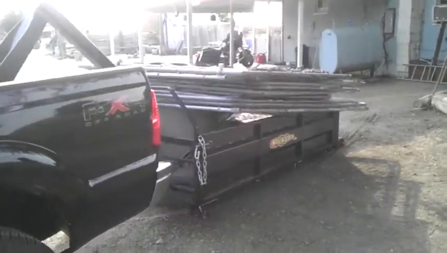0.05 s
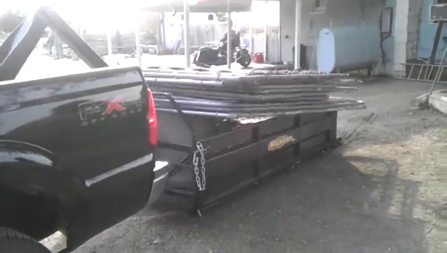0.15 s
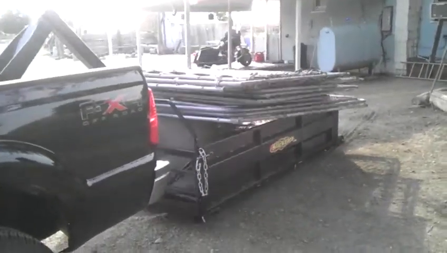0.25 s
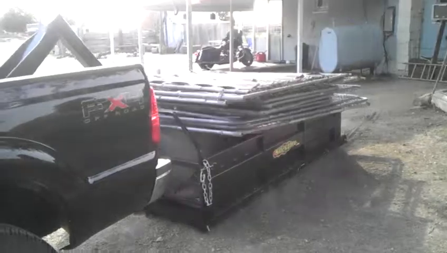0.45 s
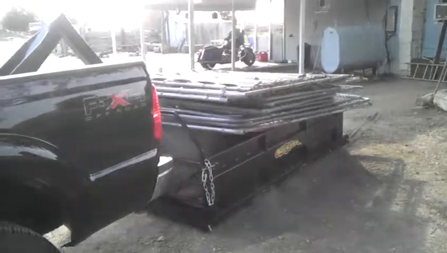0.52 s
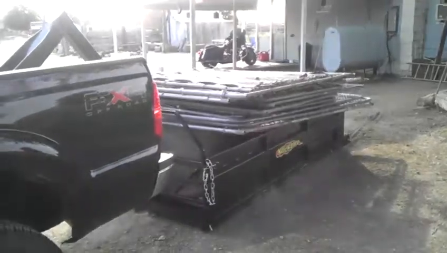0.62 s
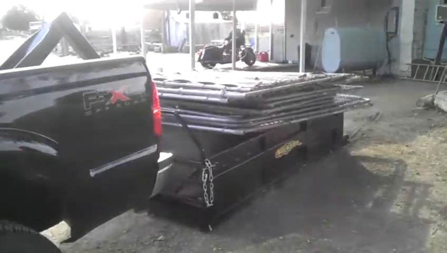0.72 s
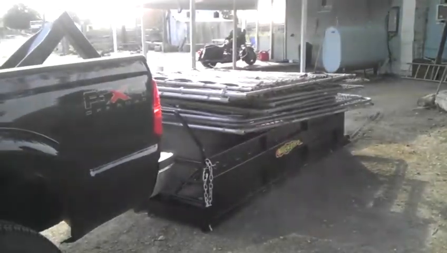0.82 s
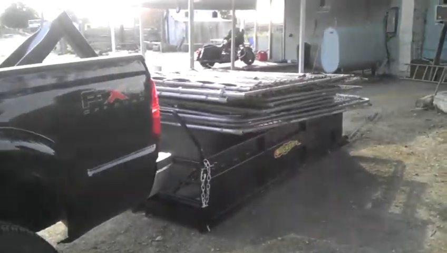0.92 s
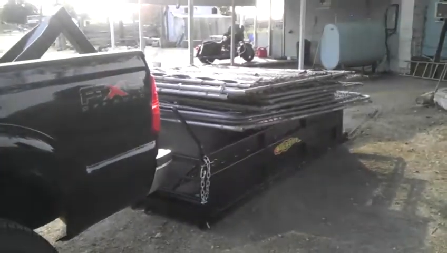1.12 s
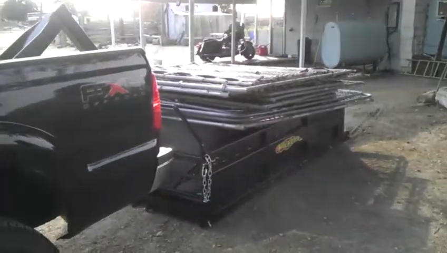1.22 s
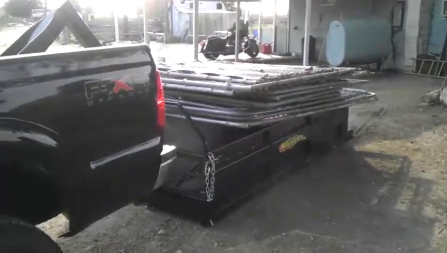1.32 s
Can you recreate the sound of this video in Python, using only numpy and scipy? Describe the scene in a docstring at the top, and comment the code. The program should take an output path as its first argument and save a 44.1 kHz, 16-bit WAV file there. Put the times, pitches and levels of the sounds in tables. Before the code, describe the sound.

A loaded steel skip lands on dirt while a hydraulic pump whines over a low truck idle. A light knock at 0.2 seconds leads to a loud, slightly distorted boom and clank around 0.4 to 0.5 seconds. Pipe gates rattle, groan and creak until about 0.8 seconds, then settle with smaller knocks. Near 0.9 seconds the pump switches off and its whine falls in pitch.

```python
"""A hydraulic pump whines over an idling truck as it lowers a steel skip of pipe gates in a yard.
One corner touches, then the whole frame slams onto the dirt with a boom and a clank that clips the
input; the gates rattle, groan and settle. Relieved of the weight, the pump changes its whine, is
switched off and coasts down, its falling tones flaring in the resonances of its housing."""
import sys
import numpy as np
from scipy import signal
from scipy.fft import rfft, irfft, next_fast_len
from scipy.io import wavfile
from scipy.ndimage import map_coordinates

SR = 44100
rng = np.random.default_rng(int(sys.argv[2]) if len(sys.argv) > 2 else 0)


def materialize(psi):
    """Save the field psi as 16-bit PCM at rate SR to the path in sys.argv[1].

    A 1-D psi becomes a single channel; in a 2-D psi each row is a channel.
    """
    bounded = np.clip(np.atleast_2d(psi).T, -1, 1)
    quanta = np.round(bounded * 32767).astype(np.int16)
    wavfile.write(sys.argv[1], SR, quanta)


N = 59535

# Pump whine under load, running free and coasting, all at full shaft speed: pitch_hz, level_db
LOADED_TONES = [(995.9, -41), (1077, -32.5), (1244, -43), (2154, -34), (2406, -45), (3235, -46),
                (3898, -59), (4312, -51), (4807, -43), (5556, -50.5), (6465, -47), (6632, -48), (6799, -50),
                (6880, -46), (6966, -62), (7214, -60), (7461, -54), (7628, -61), (8123, -52), (8210, -48.5),
                (8624, -54), (8705, -58), (8872, -50), (9701, -52.5), (10777, -71)]
FREE_TONES = [(1077, -36), (2157, -37.5), (5389, -42.5), (6465, -50), (7542, -57), (8624, -56)]
COAST_TONES = [(1078, -43), (2156, -43.5), (2404, -42.5), (3067, -47), (4808, -52), (5389, -52),
               (6465, -50), (11300, -54)]
# Fader on the pump's buzz and oil hiss: time_s, level_db
PUMP_FADER = [(0, -36), (.45, -34), (.55, -70), (.62, -39), (.72, -37), (1.0, -36), (1.2, -42.5),
              (1.35, -44.5)]
# Colour of that buzz and hiss: frequency_hz, gain_db
PUMP_EQ = [(300, -45), (520, -7), (750, 2), (1100, 5.5), (1550, -11.5), (2200, 4), (2900, -9), (4000, -10),
           (4800, -6.5), (5900, -13), (6700, -7), (8300, -5.5), (9500, -14.5), (11500, -19), (13500, -24)]
# Resonances of the pump housing: centre_hz, half_width_hz, boost_db
HOUSING_PEAKS = [(1142, 26, 18), (1835, 50, 9), (2070, 60, 4)]
SHAFT_HZ, SLOWING_PER_S = 82.89, 2.2
RELIEF_S, FREE_S, OFF_S, CROSSFADE_S = 0.56, 0.68, .935, 0.02  # load off, running free, power off

# Engine notes of the truck: pitch_hz, level_db
IDLE_TONES = [(143, -43), (167, -43), (214, -36.5), (236.9, -36), (581, -43), (910, -44.5)]
# Colour of its rumble: frequency_hz, gain_db
RUMBLE_EQ = [(25, -47), (50, -50), (75, -9.5), (110, -7), (160, 0), (220, -1), (320, -3.5), (480, -12.5),
             (750, -11), (1500, -21), (4000, -67)]
# Fader on the truck: time_s, level_db
TRUCK_FADER = [(0, -30), (.1, -34.5), (.25, -29.5), (.6, -29), (.9, -41.5), (1.35, -37)]

# Blows on the skip's frame: start_s, level_db, tilt_db_per_octave, rise_s, ring_db
BLOWS = [(0.201, -26.5, 0.5, 0.0037, -16), (0.405, -18.5, 1, 0.012, -1), (0.457, -15.5, 3.5, 0.0073, -3.5),
         (.468, -15.5, 0.5, 0.00044, -2.5), (0.485, -15.5, 2, 0.0011, -9.5),
         (0.496, -14.5, -3.5, 0.0049, -9), (0.555, -23.5, -1.5, 0.0074, -3.5),
         (0.587, -34, -15, 0.0045, -27), (0.667, -30, 10.5, 0.0055, -10), (0.759, -28, 0.5, 0.0034, -4),
         (.786, -24.5, 1, 0.0029, -6), (0.848, -30, -10, 0.0036, -4), (0.945, -31, -1, 0.0014, 1),
         (0.972, -24.5, -10, 0.0056, -7.5)]
# Colour of a blow: frequency_hz, gain_db
FRAME_EQ = [(30, -45.5), (55, -36), (80, -17), (140, 0.5), (280, 1.5), (440, -4), (600, -2), (900, -6),
            (1400, -8), (2300, -9), (3500, -25), (7000, -27), (13000, -34.5)]
# Main notes of the frame: pitch_hz, level_db, t60_s
FRAME_MODES = [(141.1, -12, 0.24), (210.1, -2, 0.24), (300.6, 3, 0.16), (529.3, -3.5, 0.17), (616, -3, 0.2),
               (711, -4, 0.27), (789, -6, 0.49), (923, -13.5, 0.59), (1010, -22, 1)]
# Ring-out of the panels: frequency_hz, t60_s
PANEL_DECAY = [(80, 0.35), (300, 1), (1000, 0.56), (2500, 0.68), (9000, 0.13)]
# Panel booms from heavy contacts with the soil: start_s, pitch_hz, level_db, t60_s
BOOMS = [(0.409, 809.4, -13.5, 0.073), (0.408, 1074, -20, 0.11), (0.409, 270.8, -6.5, 0.031),
         (0.474, 85.3, -15.5, 0.1), (0.468, 598.5, -6.5, 0.08), (0.467, 690, -9.5, 0.087),
         (0.48, 535.8, -12, 0.099), (0.493, 313, -2, 0.046), (0.557, 617.4, -20.5, 0.087),
         (0.594, 237.7, -22, 0.036), (0.8, 274.2, -17.5, 0.088)]

# Pipe gates shifting on each other: peak_s, level_db, rise_s, t60_s
RATTLES = [(0.425, -40, 0.0076, 0.2), (0.475, -17.5, 0.009, 0.15), (0.545, -25, 0.026, 0.42),
           (0.697, -29.5, 0.023, 0.23), (.955, -36, 0.012, 0.13), (1.112, -35, 0.0039, 0.26),
           (1.18, -35, 0.0054, 0.54)]
# Colour of a rattle: frequency_hz, gain_db
RATTLE_EQ = [(600, -40), (1500, -3.5), (2600, 5.5), (4000, -1.5), (6000, -3), (9000, -12.5), (13500, -27)]
# Steel-on-steel hits: start_s, level_db
CLANKS = [(0.472, 3.5), (0.4726, -2)]
# High partials of the steel, the wider the shorter: pitch_hz, nominal_width_hz, level_db
STEEL_MODES = [(1590, 200, -10), (2153, 64, -7), (2536, 102, -3.5), (3004, 230, 5), (3784, 220, -10.5),
               (4163, 174, -7), (5250, 294, -6.5), (7600, 64, -14.5)]
# Colour of the clank's crack: frequency_hz, gain_db
CRACK_EQ = [(800, -8), (2500, 5), (4500, 1), (7000, -5.5), (10000, -10), (13500, -52)]
# Rubbing steel, one path for a long groan and one for a quick creak: time_s, pitch_hz, level_db
GROAN_PATHS = [
    [(.54, 800, -46), (.575, 780, -23.5), (.64, 711, -32.5), (.68, 671, -31), (.71, 640, -63)],
    [(.781, 1246, -46), (.792, 831, -37), (.806, 600, -53)],
]
# Hum of the settling gates: pitch_hz, level_db, t60_s
SETTLE_MODES = [(264, -26, 0.22), (331, -26.5, 0.35), (406.4, -20, 0.35), (498, -30.5, 0.29)]

# Balance of the pump, and of all the rest: frequency_hz, left_minus_right_db
PUMP_PAN = [(300, -6), (1000, -3.5), (2200, -9), (4800, -4.5), (8000, -5.5), (12000, -11.5)]
SKIP_AND_TRUCK_PAN = [(60, -3), (300, -2), (700, -1.5), (1500, -4), (2500, -9.5), (4000, -3), (6000, -1.5),
                      (10000, -13.5)]
# Likeness of left and right, 1 being mono: frequency_hz, correlation
STEREO_LIKENESS = [(60, 1), (400, 0.91), (800, 0.97), (1500, 0.38), (3000, 0.24), (6000, 0.16),
                   (12000, 0.15)]
# Echo of the yard: frequency_hz, t60_s
YARD_DECAY = [(200, 0.11), (2000, 0.076), (10000, 0.19)]


def amp(db):
    """Decibels to gain."""
    return 10 ** (np.asarray(db) / 20)


def unit(x):
    """Scale to rms 1."""
    return x / np.sqrt(np.mean(x ** 2) + 1e-20)


def along(points, hz):
    """Read a curve at hz on a log frequency axis."""
    frequencies, values = np.transpose(points)
    return np.interp(np.log(hz + 1), np.log(frequencies + 1), values)


def clock():
    """Time of every sample."""
    return np.arange(N) / SR


def since(start_s):
    """Time since start_s, zero before."""
    return np.maximum(clock() - start_s, 0)


def curves(rows):
    """One automation lane for each column after the time."""
    times, *columns = np.transpose(rows)
    return [np.interp(clock(), times, column) for column in columns]


def wobble(rate):
    """A smooth random curve, rate knots a second."""
    return map_coordinates(rng.standard_normal(200), [clock() * rate], mode="wrap")


def decay(t, t60):
    """Gain after t seconds of ringing."""
    return amp(-60 * t / t60)


def attack(start_s, rise_s):
    """Exponential fade-in."""
    return 1 - np.exp(-since(start_s) / rise_s)


def struck(start_s, rise_s, t60):
    """Envelope of a blow."""
    return attack(start_s, rise_s) * decay(since(start_s), t60)


def filtered(x, response):
    """EQ x with a gain that is a function of frequency."""
    size = next_fast_len(N + SR // 4)
    return irfft(rfft(x, size) * response(np.fft.rfftfreq(size, 1 / SR)), size)[..., :N]


def panned(x, pan):
    """Pan each frequency to its own place."""
    return filtered(x, lambda hz: amp(np.outer([.5, -.5], along(pan, hz))))


def stereo_angle(hz):
    """Stereo width in radians, 0 being mono."""
    return np.arccos(np.clip(along(STEREO_LIKENESS, hz), -1, 1)) / 2


def spread(pair, eq, tilt_db=0):
    """Two unrelated signals become one coloured stereo sound of rms 1."""
    def response(hz):
        gain = amp(along(eq, hz) + tilt_db * np.log2(np.clip(hz, 250, 4000)))
        angle = stereo_angle(hz)
        return gain * [np.cos(angle), np.sin(angle)]
    mid, side = filtered(pair, response)
    return unit(np.array([mid + side, mid - side]))


def noise(eq, tilt_db=0):
    """Coloured stereo noise."""
    return spread(rng.standard_normal((2, N)), eq, tilt_db)


def dying(x, start_s, t60s):
    """From start_s on, each frequency of x dies at its own speed."""
    hz, t, spectrum = signal.stft(x, SR, nperseg=256)
    fade = decay(np.maximum(t - start_s, 0), along(t60s, hz)[:, None])
    return signal.istft(spectrum * fade, SR)[1][:, :N]


def tone(hz, t):
    """A stereo sine of rms 1, wider in the treble."""
    offset = stereo_angle(hz) * rng.choice([-1, 1])
    return np.sqrt(2) * np.sin(2 * np.pi * (hz * t + rng.random()) + np.array([[offset], [-offset]]))


def tones(table, t, waver_db):
    """Machine tones that waver in level."""
    return sum(amp(db + waver_db * wobble(24.6)) * tone(hz, t) for hz, db in table)


def ringing(modes, start_s, rise_s):
    """A set of modes struck together."""
    return sum(amp(db) * tone(hz, clock()) * struck(start_s, rise_s, t60) for hz, db, t60 in modes)


def pump(oil_db=2.5, oil_loaded_db=-3, echo_db=-6.5, coast_echo_db=-9):
    """Gear whine, shaft buzz and oil hiss that opens up with the load off; unpowered, oil drag slows it."""
    after = lambda s: np.clip((clock() - s) / CROSSFADE_S + .5, 0, 1)
    speed = (1 + 0.00041 * wobble(19.16)) / (1 + SLOWING_PER_S * since(OFF_S))
    shaft_time = np.cumsum(speed) / SR  # a clock that slows with the shaft
    loaded = 1 - after(RELIEF_S)
    whine = loaded * tones(LOADED_TONES, shaft_time, waver_db=.7)
    whine += (after(FREE_S) - after(OFF_S)) * tones(FREE_TONES, shaft_time, waver_db=1.8)
    coast = after(OFF_S) * coasting(speed, shaft_time)
    whine += coast + amp(coast_echo_db) * yard_echo(coast)
    buzz = unit(sum(amp(along(PUMP_EQ, hz * speed) + rng.normal(0, 3.8)) * tone(hz, shaft_time)
                    for hz in SHAFT_HZ * np.arange(6, 166)))
    hiss = amp(oil_db + oil_loaded_db * loaded) * noise(PUMP_EQ)
    fader_db, = curves(PUMP_FADER)
    sound = whine + amp(fader_db) * (buzz + hiss)
    return panned(sound + amp(echo_db) * yard_echo(sound), PUMP_PAN)


def yard_echo(x):
    """The walls throw back a short, diffuse tail."""
    tail = dying(rng.standard_normal((2, N)), 0, YARD_DECAY)
    return signal.fftconvolve(x, tail / np.linalg.norm(tail[0]), axes=1)[:, :N]


def truck(notes_db=0.5):
    """The idling engine lays down a low rumble with a few notes in it."""
    fader_db, = curves(TRUCK_FADER)
    rumble = amp(fader_db) * noise(RUMBLE_EQ)
    notes = tones(IDLE_TONES, clock(), waver_db=2)
    return rumble + amp(fader_db - fader_db.max() + notes_db) * notes


def frame_blows(modes_db=-5, pivot_hz=300):
    """Each blow gives a short thud, a dense ring of the panels and the main notes of the frame."""
    out = np.zeros((2, N))
    for start_s, db, tilt_db, rise_s, ring_db in BLOWS:
        thud = noise(FRAME_EQ, tilt_db) * struck(start_s, rise_s, t60=0.065)
        panels = dying(noise(FRAME_EQ, tilt_db), start_s, PANEL_DECAY) * attack(start_s, rise_s)
        modes = [(hz, mode_db + tilt_db * np.log2(hz / pivot_hz) + rng.normal(0, 1.6), t60)
                 for hz, mode_db, t60 in FRAME_MODES]
        ring = panels + amp(modes_db) * ringing(modes, start_s, rise_s)
        out += amp(db) * (2 * thud + amp(ring_db) * ring)
    return out


def booms():
    """Each heavy landing booms a panel, and the soil quickly damps it."""
    return sum(ringing([(hz, db, t60)], start_s, rise_s=0.0018) for start_s, hz, db, t60 in BOOMS)


def rattles(grains_per_s=5300, scatter_db=3.5):
    """The gates knock together in bursts of tiny contacts."""
    out = np.zeros((2, N))
    for peak_s, db, rise_s, t60 in RATTLES:
        contacts = rng.random((2, N)) < grains_per_s / SR
        grains = contacts * rng.choice([-1, 1], (2, N)) * amp(scatter_db * rng.standard_normal((2, N)))
        swell = np.exp(np.minimum(clock() - peak_s, 0) / rise_s)
        out += amp(db) * spread(grains, RATTLE_EQ) * swell * decay(since(peak_s), t60)
    return out


def clank(crack_db=-7, damping=1.57):
    """Steel hits steel: a crack and bright partials that choke fast."""
    out = np.zeros((2, N))
    for start_s, db in CLANKS:
        t = since(start_s)
        ring = sum(amp(mode_db) * tone(hz, t) * np.exp(-damping * width * t)
                   for hz, width, mode_db in STEEL_MODES)
        crack = amp(crack_db) * noise(CRACK_EQ) * decay(t, t60=0.034)
        out += amp(db) * attack(start_s, rise_s=0.00047) * (.5 * ring + crack)
    return out


def groans():
    """Sliding gates rub out rough, falling notes."""
    out = np.zeros(N)
    for path in GROAN_PATHS:
        hz, db = curves(path)
        sliding = (clock() > path[0][0]) & (clock() < path[-1][0])
        out += sliding * amp(db + 1.4 * wobble(89.8)) * np.sin(2 * np.pi * np.cumsum(hz) / SR)
    return out


def coasting(speed, shaft_time, jitter_hz=25, waver_db=3, fade_db_per_s=6):
    """The unpowered rotor chatters once a turn; its rough tones flare through the housing's peaks."""
    out = np.zeros((2, N))
    for hz, db in COAST_TONES:
        flare_db = sum(boost / (1 + ((hz * speed - centre) / width) ** 2)
                       for centre, width, boost in HOUSING_PEAKS)
        jitter_s = np.cumsum(jitter_hz * wobble(240)) / SR / hz
        chatter = 1 + .6 * np.sin(2 * np.pi * (SHAFT_HZ * shaft_time + rng.random()))
        level_db = db + flare_db + waver_db * wobble(110) - fade_db_per_s * since(OFF_S)
        out += amp(level_db) * unit(chatter) * tone(hz, shaft_time + jitter_s)
    return out


def settling():
    """The gates hum as they come to rest."""
    return ringing(SETTLE_MODES, start_s=0.947, rise_s=0.023)


def scene():
    """Skip, gates and truck share one pan, the pump has its own; both lean to the right."""
    skip = frame_blows() + booms() + clank() + rattles() + groans() + settling()
    return panned(skip + truck(), SKIP_AND_TRUCK_PAN) + pump()


def record(dry, low_cut_hz=74, top_hz=13750):
    """The microphone sheds deep bass, the input soft-clips on the bang and the very top is cut."""
    heard = signal.sosfilt(signal.butter(2, low_cut_hz, "highpass", fs=SR, output="sos"), dry)
    clipped = heard / (1 + np.abs(heard) ** 8) ** (1 / 8)
    return filtered(clipped, lambda hz: hz < top_hz)


dry = scene()
out = record(dry)
materialize(out)
```